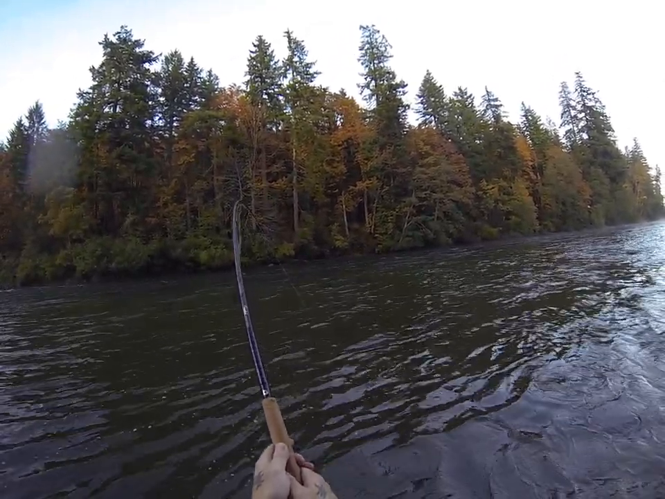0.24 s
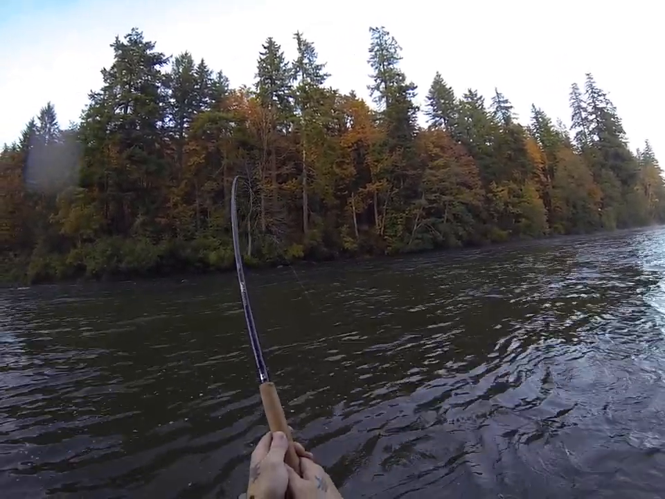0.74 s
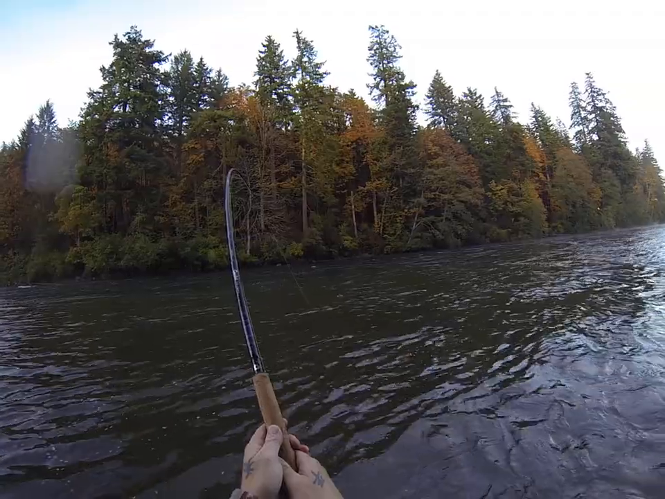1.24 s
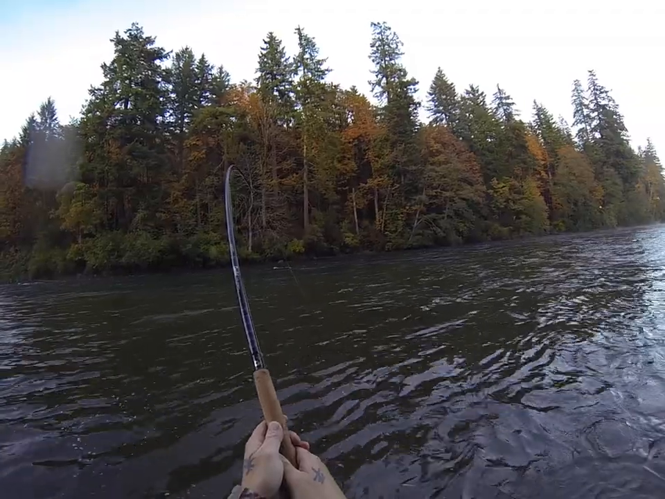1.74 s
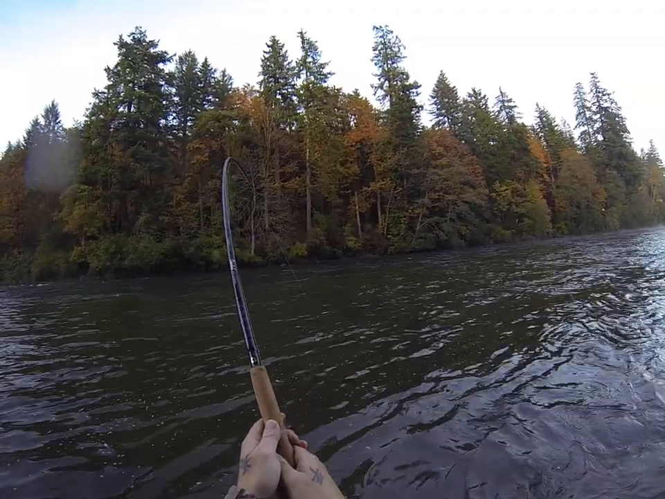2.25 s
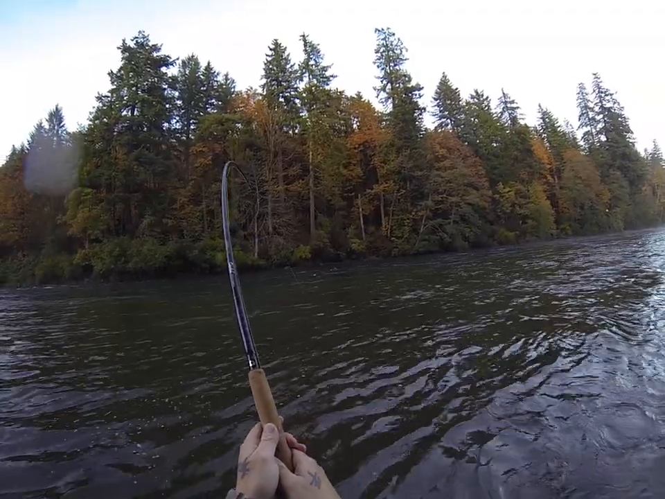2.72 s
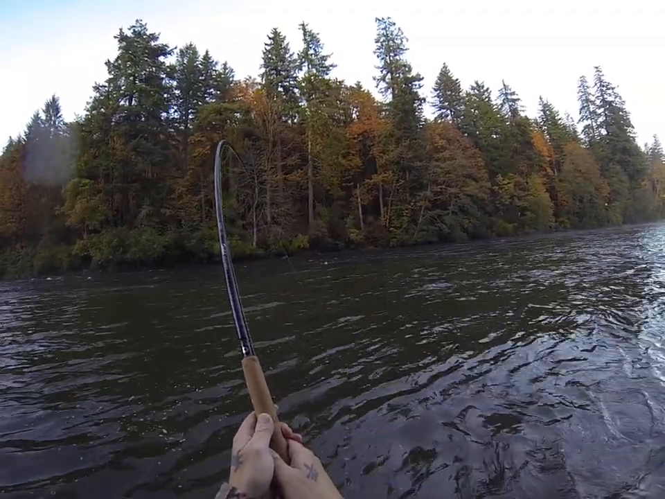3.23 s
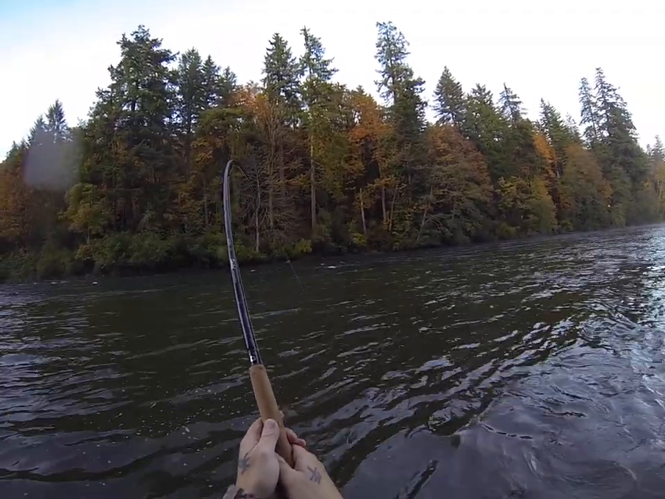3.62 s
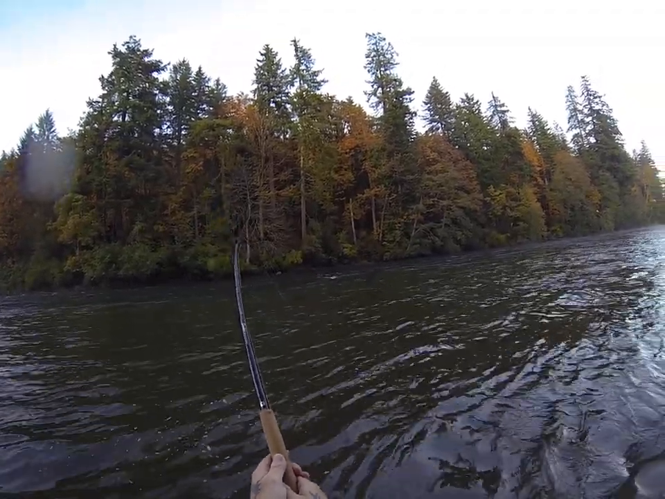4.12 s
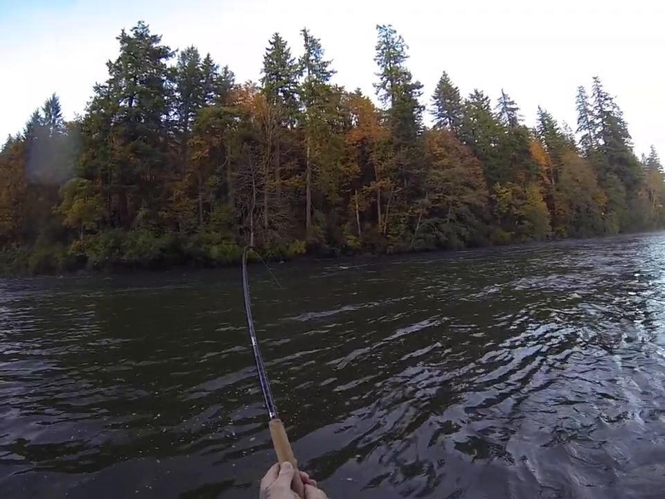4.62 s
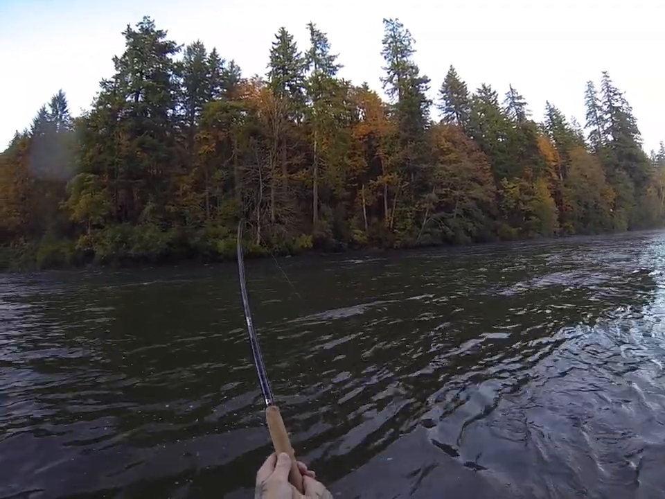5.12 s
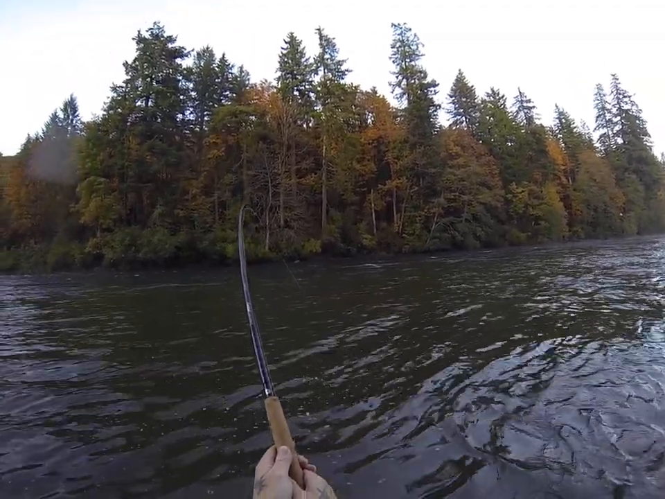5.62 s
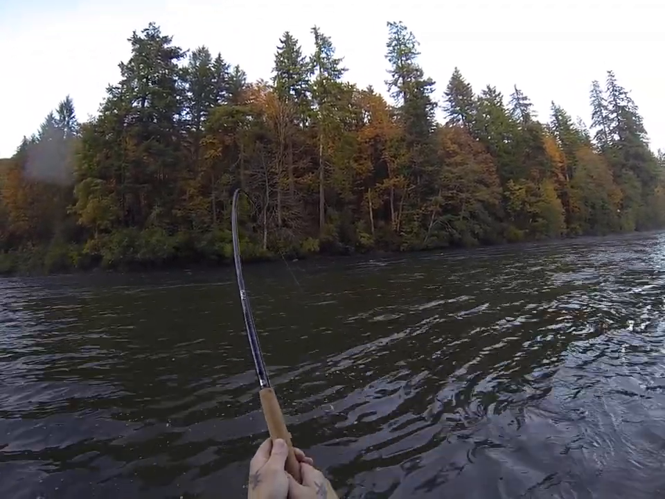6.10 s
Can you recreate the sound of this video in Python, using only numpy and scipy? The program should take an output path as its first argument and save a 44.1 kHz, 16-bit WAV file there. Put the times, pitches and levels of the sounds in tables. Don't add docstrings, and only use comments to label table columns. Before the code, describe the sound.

Outdoors on a broad river, a quiet, sealed camera strapped to an angler's chest hears a continuous boxy rush of water and fine bubbles. Beneath it, deep trembling and quick heartbeat thumps mix with low jolts from the arms. Close drops gulp, plink and tick irregularly, more often in the last two seconds, with soft strap knocks and a faint pulsing whine.

```python
import sys
import numpy as np
from scipy import signal
from scipy.fft import rfft, irfft, next_fast_len
from scipy.io import wavfile
from scipy.ndimage import uniform_filter1d

SR = 44100
rng = np.random.default_rng(int(sys.argv[2]) if len(sys.argv) > 2 else 0)


def digitize_waveform(pressure):
    field = np.atleast_2d(pressure).T
    bounded = np.clip(field, -1, 1)
    quanta = np.round(bounded * 32767).astype(np.int16)
    wavfile.write(sys.argv[1], SR, quanta)


def ratio(d):
    e = np.asarray(d, float) / 20
    return 10 ** e


N = 280476

# [t/s, level/dB]
RUSH = [(0, -57.5), (1.5, -57.5), (2.5, -57), (3.5, -57), (4, -56.5), (4.4, -57), (4.7, -55), (5.3, -55.5),
        (5.6, -56.5), (5.9, -56.5), (6.36, -57)]
FIZZ_LAG = 0.26
# [f/Hz, density/dB per Hz]
WASH = [(50, -15), (66, -10), (85, -18.5), (104, -16.5), (125, -21), (200, -24), (431, -28.5), (862, -29.5),
        (1000, -35), (1400, -61)]
WASH_DB = -61.5
# [f/Hz, density/dB per Hz]
HISS = [(700, -25.5), (1050, -22), (2500, -20.5), (4200, -23.5), (6000, -25), (8500, -30), (11000, -31.5),
        (13480, -35), (13560, -42), (13800, -47), (13900, -34), (15400, -39)]
# [f/Hz, width/Hz, level/dB]
CASE_MODES = [(1237, 87, 16.5), (1570, 483, 24), (1890, 220, 13.5), (2350, 170, 3), (3137, 700, 10.5),
              (3700, 380, 5.5), (4990, 840, 1.5), (7640, 2300, -1), (9700, 700, 0), (11800, 350, 1.5)]
# [f/Hz, density/dB per Hz]
TREMBLE = [(4.7, -19.5), (8.0, -4), (27, 2), (43, 2.5), (57, -2.5), (75, -33), (98, -54), (160, -120)]
TREMBLE_DB = -45.5
PICTURES_PER_S, READ_SHARE = 47.951, .385
# [f/Hz, level/dB, phase wander/rad, level wander/dB, rise/s, pitch climb/(Hz/s),
# dip of every other picture/dB]
WHINE = [
    (6427, -70, .85, 2.6, .0003, 0, 1.5),
    (12889, -66.7, 1.5, .4, .0012, 2500, 0),
]
# [t/s, peak level/dB, f/Hz]
GULPS = [(0.035, -55, 1590), (0.553, -52, 1650), (0.6272, -46, 1590), (3.097, -43, 1620),
         (3.742, -39, 1490), (3.926, -44, 1690), (4.1108, -47, 1600), (4.2766, -47, 1570),
         (4.4513, -38, 1450), (5.1696, -42, 1470), (5.4141, -47, 1530), (5.5772, -49, 1580),
         (5.6928, -44, 1580), (5.858, -43.5, 1520), (5.874, -44, 1550), (5.9559, -41.5, 1550)]
# [t/s, peak level/dB, f/Hz]
PLINKS = [
    (0.2144, -49, 3700),
    (0.9133, -55, 3000),
    (4.9771, -50, 2160),
    (5.0419, -43.5, 2220),
    (5.3168, -50, 2250),
]
# [t/s, peak level/dB, f/Hz]
TICKS = [(2.5964, -65, 5360), (2.6124, -62, 5030), (2.6324, -56, 4850), (2.6304, -56, 5100),
         (2.645, -60, 5110), (2.6514, -57, 4750), (3.4396, -59, 4780), (4.1425, -49, 4900),
         (4.6409, -56, 4980), (4.9142, -55, 4930), (5.1696, -60, 5040), (5.6516, -55, 4730)]
# [t/s, peak level/dB, width/s]
JOLTS = [(0.118, -36, 0.02), (.168, -36.5, 0.04), (.84, -34.5, 0.013), (1.156, -33, 0.03),
         (1.744, -34.5, 0.032), (2.164, -34.5, 0.028), (2.495, -41, .06), (2.663, -39, 0.053),
         (3.02, -35, 0.039), (3.26, -39, 0.061), (3.748, -32.5, 0.025), (4.146, -30.5, 0.034),
         (4.235, -31.5, 0.028), (4.33, -40, 0.032), (4.53, -36, .03), (4.77, -33, 0.045), (5.065, -39, .03),
         (5.489, -34, 0.024), (5.629, -40, 0.057), (5.699, -31.5, 0.03), (6.077, -38, 0.068)]
JOLT_HZ = 33.1
# [t/s, first thump level/dB, its width/s, delay of second thump/s, second thump level/dB]
BEATS = [(0.328, -32, 0.063, 0.25, -37), (.697, -28, 0.038, 0.2, -35), (1.071, -29.5, 0.034, .217, -39.5),
         (1.444, -32, 0.071, 0.21, -34.5), (1.819, -32.5, 0.039, 0.22, -35), (2.2, -36.5, 0.072, 0.22, -39),
         (2.577, -30.5, 0.033, 0.2, -32), (2.948, -39.5, 0.064, .164, -42), (3.328, -29, 0.047, .195, -48),
         (3.699, -29.5, 0.047, 0.23, -31.5), (4.071, -30, 0.075, 0.21, -36),
         (4.444, -32.5, 0.033, 0.23, -49), (4.822, -37, 0.086, 0.15, -38),
         (5.194, -29.5, 0.046, 0.23, -31.5), (5.566, -36, 0.053, .243, -40),
         (5.941, -30, 0.053, 0.24, -29.5), (6.313, -32, 0.072, .23, -36)]
FIRST_HZ, FIRST_LEAD_S = 37.7, 0.0075
SECOND_HZ, SECOND_WIDTH_S = 35.4, 0.027
REBOUND_S, REBOUND_DB, REBOUND_HZ, REBOUND_WIDTH_S = 0.0908, -12.5, 34.3, 0.016
# [f/Hz, level re thump/dB, width/s]
RATTLE = [
    (70, -25.5, 0.05),
    (104.5, -35, 0.063),
]
# [t/s, peak level/dB, f/Hz, width/s]
KNOCKS = [(.33, -59, 151, .02), (.69, -51, 95, 0.021), (.69, -57.5, 190, .013), (.695, -59, 433, .012),
          (.69, -72, 290, .01), (1.43, -61, 68, 0.062), (1.74, -60, 103, .05), (2.18, -60, 105, 0.06),
          (2.55, -59, 68, .055), (2.95, -58, 97, 0.056), (4.39, -56.5, 103, .082), (4.8, -62, 157, 0.051),
          (5.64, -61, 90, .059)]


def evened(x):
    return x / np.sqrt(np.mean(x ** 2) + 1e-20)


def read(points, hz):
    f, value = np.transpose(points)
    return np.interp(np.log(hz + 1), np.log(f + 1), value, left=-120, right=-120)


def add(mix, start_s, sound):
    part = mix[max(round(start_s * SR), 0):][:len(sound)]
    part += sound[:len(part)]


def coloured(x, db_of):
    size = next_fast_len(N)
    gain = ratio(db_of(np.fft.rfftfreq(size, 1 / SR)))
    return evened(irfft(rfft(x, size) * gain, size)[:N])


def case_db(hz):
    lift = sum(ratio(2 * db) / (1 + (2 * (hz - f) / width) ** 2) ** 2 for f, width, db in CASE_MODES)
    return read(HISS, hz) + 10 * np.log10(1 + lift)


def patchy(patchy_db, flicker_db):
    frames = N // 128 + 5
    a, b, patches = rng.standard_normal((frames, 257, 3)).T
    patches = uniform_filter1d(patches, size=6, axis=0)
    patches = evened(uniform_filter1d(patches, size=20, axis=1))
    flicker = evened(uniform_filter1d(rng.standard_normal(frames), size=8))
    z = (a + 1j * b) * ratio(patchy_db * patches + flicker_db * flicker)
    return evened(signal.istft(z, nperseg=512, noverlap=384)[1][:N])


def bubbles(per_s, spread_db, count=24):
    strength = ratio(spread_db * np.minimum(rng.exponential(1, N), 5))
    strength = strength * (rng.random(N) < per_s / SR)
    kind = rng.integers(0, count, N)
    out = np.zeros(N)
    for k, hz in enumerate(np.geomspace(900, 7000, count)):
        cycles = np.arange(round(14 * SR / hz)) * hz / SR
        swell = cycles * np.exp(-cycles / 1.94)
        tone = np.sin(2 * np.pi * cycles * (1 + 0.0078 * cycles)) * swell
        tone = tone * np.sqrt(hz) / np.linalg.norm(tone)
        out += signal.oaconvolve(strength * (kind == k), tone)[:N]
    return evened(out)


def river():
    s, rush_db = np.transpose(RUSH)
    t = np.arange(N) / SR
    near = ratio(-9) * bubbles(per_s=4000, spread_db=2.4)
    water = coloured(patchy(patchy_db=0.43, flicker_db=0.7) + near, case_db)
    low = signal.sosfiltfilt(signal.butter(2, 2200, fs=SR, output="sos"), water)
    fizz_db = FIZZ_LAG * (rush_db.mean() - rush_db)
    fizz = ratio(np.interp(t, s, fizz_db)) * (water - low)
    wash = coloured(patchy(patchy_db=-0.78, flicker_db=0.5), lambda hz: read(WASH, hz))
    swell = ratio(np.interp(t, s, rush_db) + 0.14)
    return swell * (low + fizz) + ratio(WASH_DB) * wash


def tremble():
    return ratio(TREMBLE_DB) * coloured(rng.standard_normal(N), lambda hz: read(TREMBLE, hz))


def through_strap(x):
    return signal.sosfiltfilt(signal.butter(5, 60, fs=SR, output="sos"), x)


def whine():
    place = np.arange(N) / SR * PICTURES_PER_S
    picture = place.astype(int)
    since_s = place % 1 / PICTURES_PER_S
    left_s = READ_SHARE / PICTURES_PER_S - since_s
    out = np.zeros(N)
    for hz, db, wander_rad, wander_db, rise_s, climb, dip_db in WHINE:
        turn, size = rng.standard_normal((picture[-1] + 1, 2)).T
        rise = 1 - .7 * np.exp(-since_s / rise_s)
        gate = rise * np.clip(left_s / .0006 + .5, 0, 1)
        phase = np.pi * picture + wander_rad * turn[picture]
        level_db = db + wander_db * size[picture] - dip_db * (picture % 2)
        sweep = 2 * np.pi * (hz + climb * since_s / 2) * since_s
        out += ratio(level_db) * gate * np.cos(sweep + phase)
    return out


def drops(rows, cycles, snap_db):
    out = np.zeros(N)
    for s, db, hz in rows:
        turns = np.arange(round(8 * cycles * SR / hz)) * hz / SR
        ring = np.minimum(turns / 2.5, 1) * np.exp(-turns / cycles)
        add(out, s, ratio(db) * ring * np.sin(2 * np.pi * turns * (1 + 0.0012 * turns)))
        snap = rng.standard_normal(60) * np.exp(-np.arange(60) / 14)
        add(out, s, ratio(db + snap_db) * snap)
    return out


def near_drops():
    gulps = drops(GULPS, cycles=8.5, snap_db=-28)
    plinks = drops(PLINKS, cycles=5.5, snap_db=-17)
    ticks = drops(TICKS, cycles=7.0, snap_db=-16)
    return gulps + plinks + ticks


def lumps(rows, lead_s=None):
    out = np.zeros(N)
    t = np.arange(-.11, .11, 1 / SR)
    for s, db, hz, width_s in rows:
        phase = rng.uniform(0, 2 * np.pi) if lead_s is None else np.pi - 2 * np.pi * hz * lead_s
        bell = np.exp(-(t / (0.59 * width_s)) ** 2)
        add(out, s + t[0], ratio(db) * bell * np.cos(2 * np.pi * hz * t + phase))
    return out


def jolts():
    return lumps([(s, db, JOLT_HZ, width_s) for s, db, width_s in JOLTS])


def heart():
    first, rebound, second = [], [], []
    for s, db, width_s, delay_s, second_db in BEATS:
        first.append((s - FIRST_LEAD_S, db, FIRST_HZ, width_s))
        rebound.append((s + REBOUND_S, db + REBOUND_DB, REBOUND_HZ, REBOUND_WIDTH_S))
        second.append((s + delay_s, second_db, SECOND_HZ, SECOND_WIDTH_S))
    return lumps(first, FIRST_LEAD_S) + lumps(rebound, 0) + lumps(second, 0)


def rattle():
    rows = []
    for s, db, *_ in BEATS:
        for hz, under_db, width_s in RATTLE:
            rows.append((s - FIRST_LEAD_S, db + under_db, hz, width_s))
    return lumps(rows)


def knocks():
    return lumps(KNOCKS)


def scene():
    body = through_strap(tremble() + jolts() + heart())
    return (river() + body + whine() + near_drops() + rattle() + knocks())[None]


def band_limit(x):
    return signal.sosfilt(signal.butter(12, 15300, fs=SR, output="sos"), x)


def record(dry):
    return band_limit(dry)


dry = scene()
out = record(dry)
digitize_waveform(out)
```